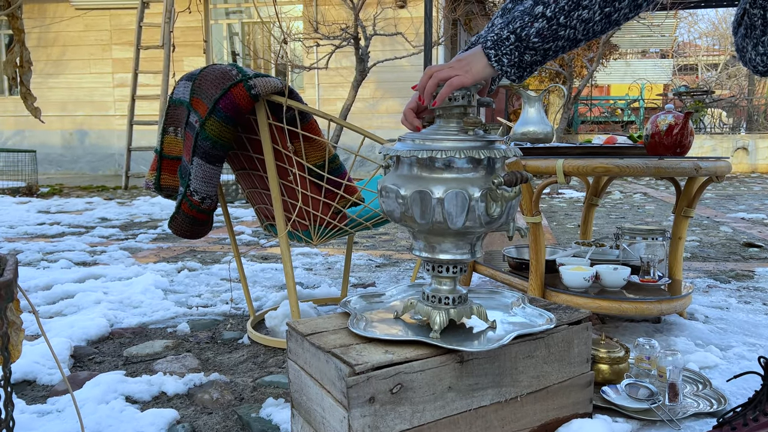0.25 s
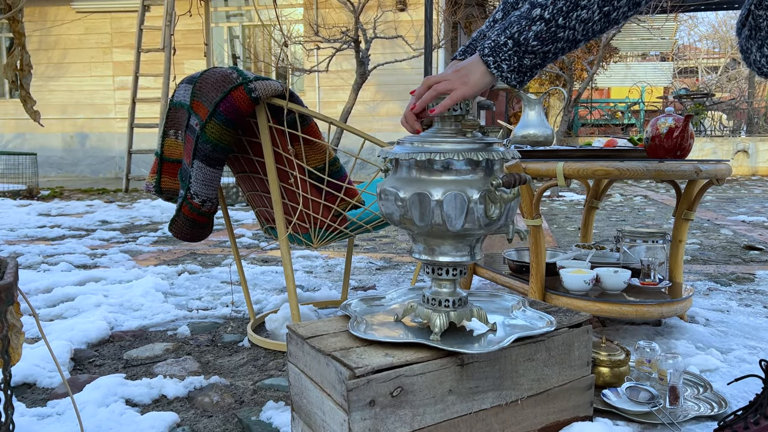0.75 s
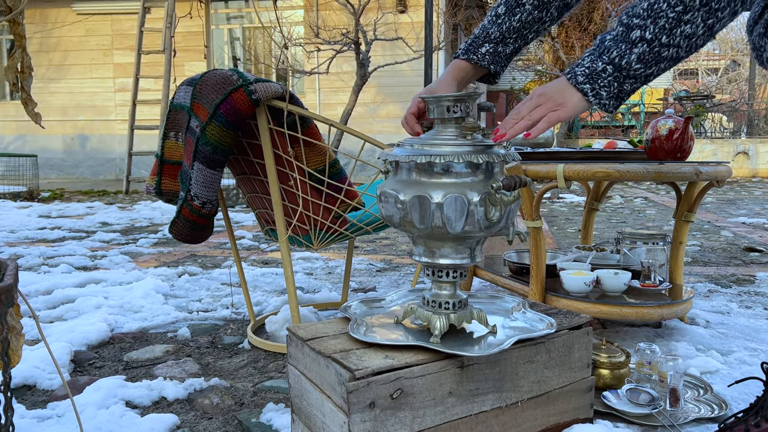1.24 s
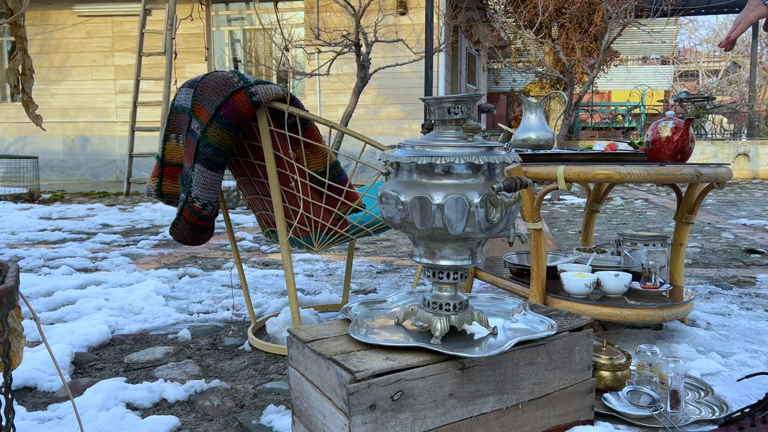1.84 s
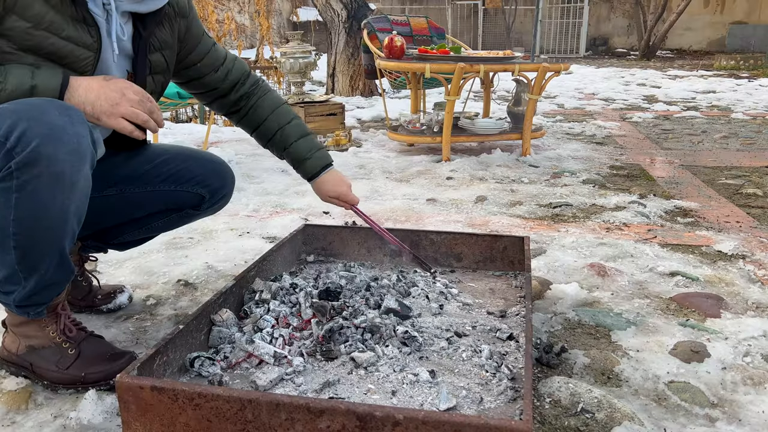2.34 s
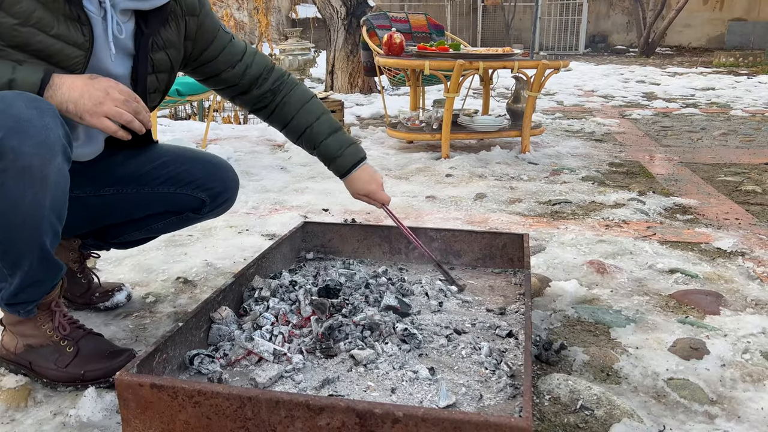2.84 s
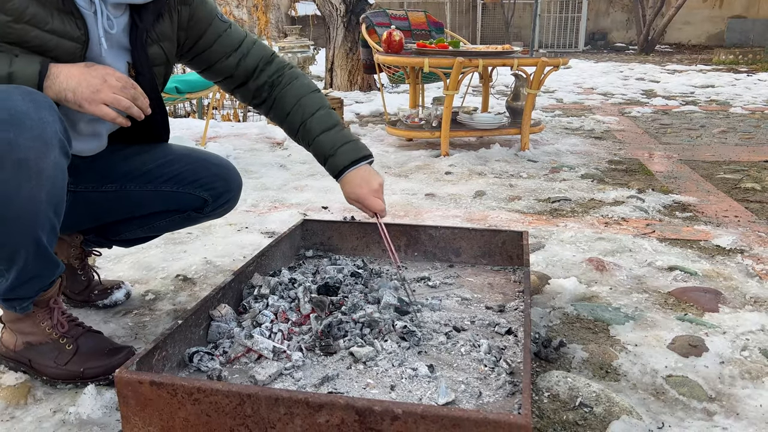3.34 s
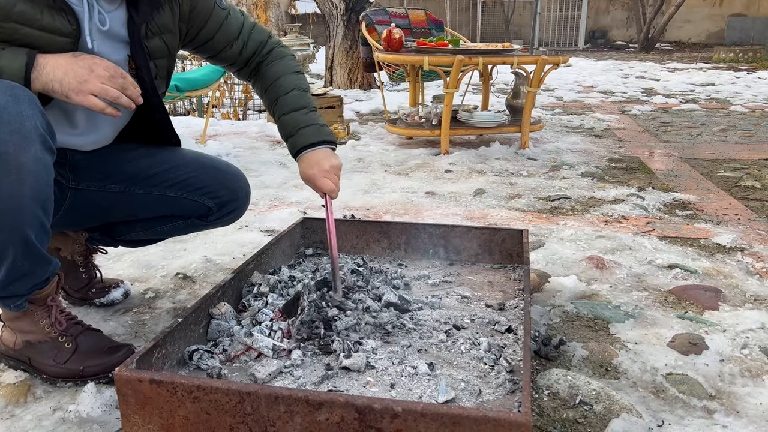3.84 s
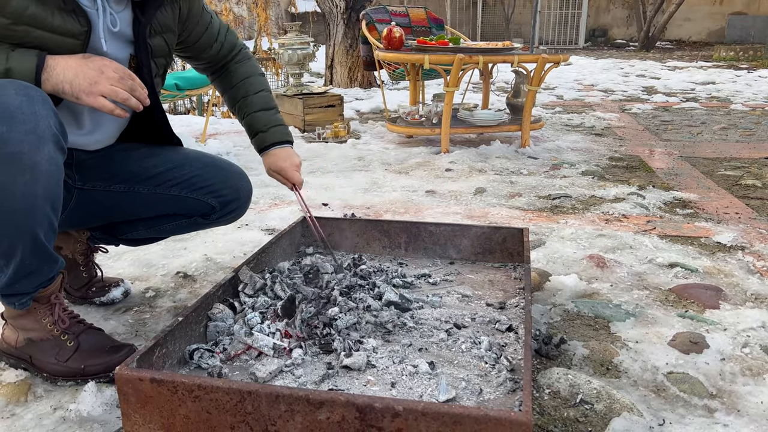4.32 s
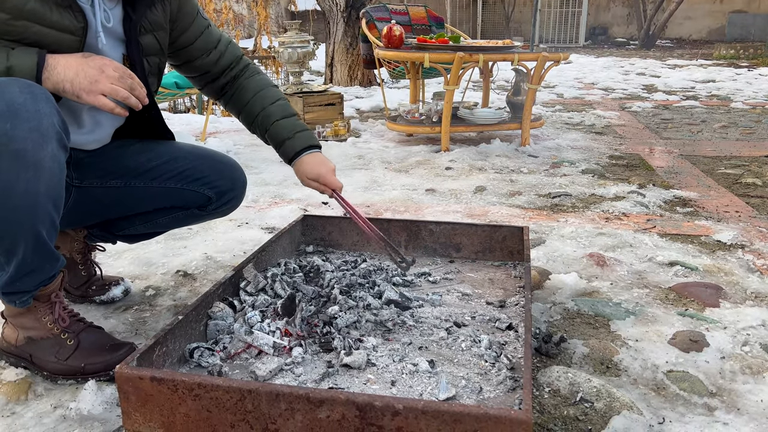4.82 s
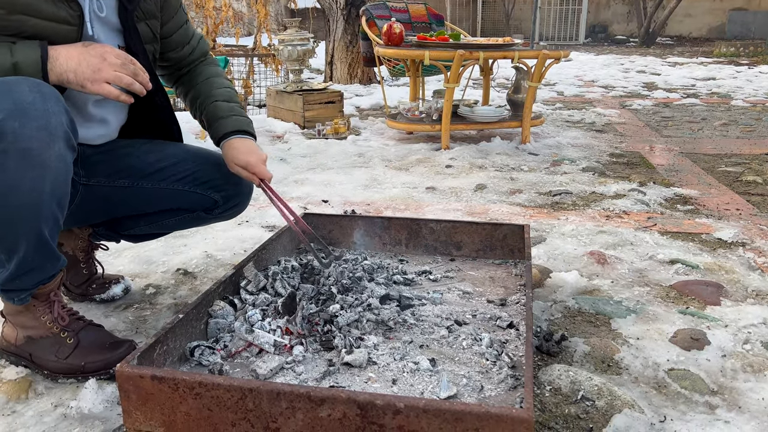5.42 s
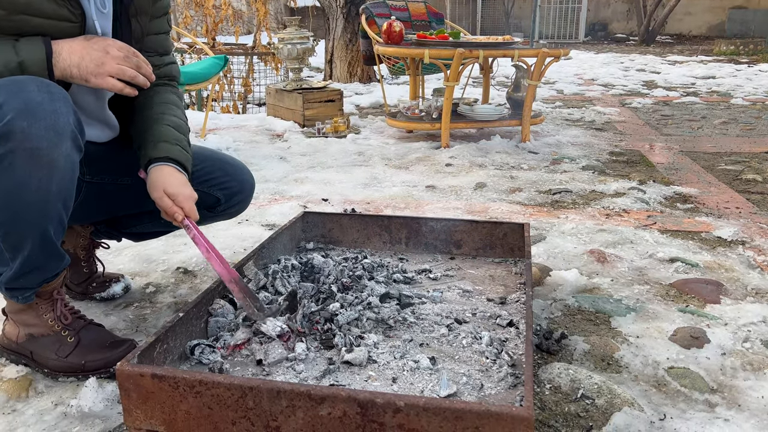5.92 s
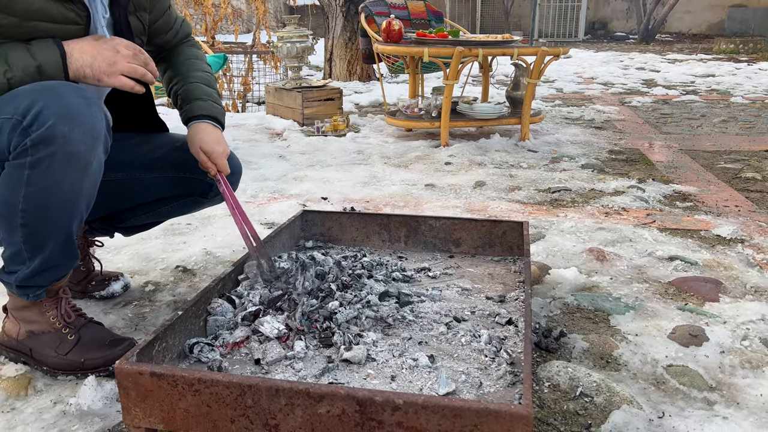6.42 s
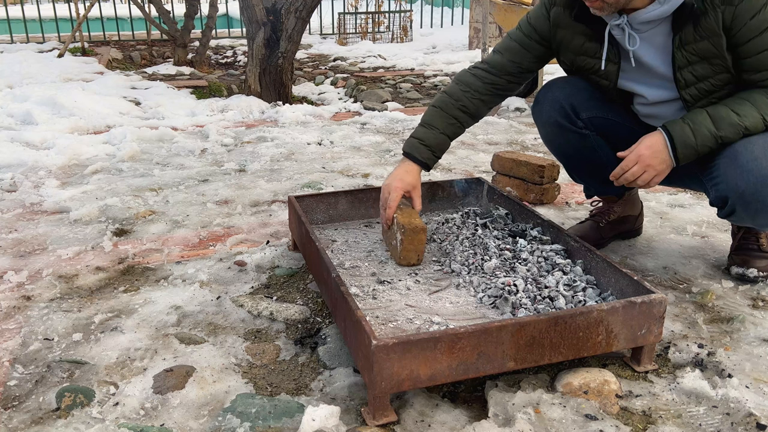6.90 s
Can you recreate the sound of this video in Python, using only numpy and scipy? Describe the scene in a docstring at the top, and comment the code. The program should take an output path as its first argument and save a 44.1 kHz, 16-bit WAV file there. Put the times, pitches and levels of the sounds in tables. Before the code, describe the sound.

Outdoors in a quiet yard, hands turn the loose metal top of a tea urn: gritty rubbing, a tiny high squeak, small taps and a faint ring. At about two seconds it cuts to steel tongs knocking a fire tray and crunching through charcoal, their arms clacking brightly. Finally a brick scrapes and knocks in the tray under a deep drone. Close stereo microphone, soft distant traffic.

```python
"""Steel tongs jab and rake charcoal in a sheet-steel fire tray, close by in a snowy yard with far traffic.
Noise bursts and gritty slips drive the sheet's resonances, ash and coals crunch, and the arms of the tongs clack.
Before that a hand turns the loose metal crown of a tea urn: rubbing grit, a gliding squeak, taps and ringing modes.
Last a brick is slid in the tray, under a nearer, deeper rumble. The traffic is shaped noise.
A two-port microphone hears each near source with its own time and level difference, plus the yard's echo."""
import sys
import numpy as np
from scipy import signal
from scipy.fft import rfft, irfft, next_fast_len
from scipy.io import wavfile
from scipy.ndimage import uniform_filter1d, map_coordinates

SR = 44100
rng = np.random.default_rng(int(sys.argv[2]) if len(sys.argv) > 2 else 0)


def dump(signal):
    """Clip the signal to [-1, 1] and save it as 16-bit WAV at the path in sys.argv[1]."""
    limited = np.clip(np.atleast_2d(signal).T, -1, 1)
    pcm = np.round(limited * 32767).astype(np.int16)
    wavfile.write(sys.argv[1], SR, pcm)


N = 315756  # length in samples

# sheet-steel tray resonances: (centre [Hz], width [Hz], level [dB])
TRAY_MODES = [(150, 92, -8), (308, 60, -1), (556, 53, -1.5), (664, 38, 2), (843, 120, -4), (980, 47, 2.5),
              (1140, 210, -7.5), (1609, 107, 0.5), (1770, 194, -5)]
# colour of crunching coals and ash: (frequency [Hz], relative level [dB])
CRUNCH_TONE = [(1000, -37), (2000, -0.5), (4700, 1.5), (6500, 3.5), (9000, -4), (12000, -4), (17000, -5)]
# jabs and tumbling coals that knock the tray: (time [s], level [dB], thud start pitch [Hz], thud level [dB])
JABS = [(2.172, -24, 443, -22), (2.182, -21, 342, -23.5), (2.242, -14, 1797, -27.5), (2.258, -30, 588, -27),
        (2.366, -30, 605, -26), (2.789, -22.5, 986, -25), (2.794, -18, 550, -27), (2.81, -20, 995, -31),
        (2.877, -26, 550, -32), (2.913, -21, 628, -29), (3.217, -51, 1650, -49), (3.382, -26, 694, -35.5),
        (4.052, -48, 404, -42), (4.275, -25, 503, -43.5), (4.392, -36.5, 678, -47),
        (4.914, -36, 572, -32.5), (5.756, -28, 655, -33), (6.109, -28, 730, -36.5), (6.125, -27, 640, -34),
        (6.249, -49, 673, -46), (6.349, -31, 386, -38), (6.56, -38.5, 393, -39), (6.747, -25.5, 790, -38.5),
        (6.821, -33, 627, -39), (6.925, -19, 650, -37), (6.967, -24, 662, -30.5), (7.046, -14.5, 818, -27)]
# the tongs stab the coals, which then settle: (time [s], fade t60 [s], tray level [dB], crunch level [dB])
STABS = [(2.175, 0.23, -29, -62), (2.243, 0.12, -29, -60), (2.79, 0.088, -27.5, -35),
         (3.217, 0.1, -43, -56), (3.372, 0.068, -40, -38.5), (3.883, 0.58, -43.5, -47),
         (4.263, 0.44, -40, -46.5), (4.564, 0.34, -43.5, -48), (4.914, 0.28, -43.5, -48),
         (5.296, 0.16, -41.5, -48.5), (5.743, 0.8, -48.5, -57.5), (6.094, 0.37, -45.5, -46),
         (6.314, 0.79, -67, -57.5), (6.535, 0.19, -39, -61), (6.744, 0.086, -36.5, -40.5),
         (6.821, 0.19, -51, -76), (6.924, 0.57, -41.5, -42)]
STAB_RISE_S = 0.005  # time to grow by 60 dB
SETTLE_DB, SETTLE_S = -24.5, 1.9  # slow trickle after each stab: level relative to the stab, t60
# tongs or brick dragged over ash and sheet: (start [s], length [s], tray level [dB], crunch level [dB])
DRAGS = [(2.299, 0.15, -37, -43.5), (2.361, 0.013, -34.5, -36), (2.583, 0.013, -67, -65.5),
         (2.845, 0.12, -37.5, -41.5), (2.969, 0.045, -39, -49), (3.422, .14, -51.5, -55),
         (4.966, 0.069, -68, -57.5), (5.408, 0.0098, -65, -64), (5.545, 0.15, -68, -66),
         (5.823, 0.037, -70, -61.5), (6.248, 0.012, -53, -86), (6.357, 0.013, -44.5, -56.5),
         (6.898, 0.052, -45, -49.5), (6.961, 0.085, -35, -47.5), (7.062, 0.08, -38.5, -52)]
DRAG_RISE_S, DRAG_FADE_S = 0.15, 0.19  # times to grow and to die by 60 dB
# phase between the ports for tray and tongs: (frequency [Hz], left lead [rad])
TRAY_LEAD = [(0, 0), (1700, 1.05), (3000, 1.1), (5500, 3.5), (9000, 3), (12300, 6.5), (16000, -10)]
# level between the ports for tray and tongs: (frequency [Hz], left minus right [dB])
TRAY_SIDE = [(100, -4), (550, 1), (1650, 1), (5000, 8.5), (9000, 1), (15000, 0)]
SPREAD_DB = 1.5  # coals away from the tip, heard differently by each port
SHEET_WIDE_DB = -8  # far parts of the sheet, heard differently by each port

# the arms of the tongs clack together: (time [s], level [dB])
CLACKS = [(2.185, -15), (2.282, -34), (2.328, -33), (2.428, -23.5), (2.66, -50), (3.369, -35), (3.383, -14),
          (3.402, -18), (3.424, -25.5), (3.4406, -29), (3.498, -36), (3.877, -33), (3.8993, -15),
          (3.923, -28.5), (4.2776, -14.5), (4.319, -23), (4.579, -12.5), (4.6, -33), (4.632, -36.5),
          (4.93, -27.5), (5.3525, -38), (6.125, -27), (7.044, -25)]
# steel modes of the arms: (centre [Hz], width [Hz], level [dB])
TONGS_MODES = [(3200, 400, -3), (4410, 500, 2), (5900, 330, 9), (6700, 300, 11), (9000, 1400, 3),
               (11650, 900, 4), (15000, 2900, -1)]

# place of crown, then tongs tip, then brick: (time [s], left port earlier by [microseconds])
PLACE = [(.2, 13), (.3, -250), (2.05, -220), (2.1, -16), (3.3, -37), (3.8, 22), (5.2, 40), (5.6, 74),
         (6.6, 86.5), (6.72, -31), (7.16, -61)]

# colour of the rubbing body: (frequency [Hz], relative level [dB])
RUB_BODY = [(180, 2), (350, 4.5), (1500, -6), (4500, -29)]
# colour of the rubbing treble: (frequency [Hz], relative level [dB])
RUB_TOP = [(1500, -3), (2600, 0.5), (7000, -2.5), (12000, -11), (17000, -10)]
# hands and crown rubbing on the urn: (start [s], length [s], rub level [dB], treble level [dB])
RUBS = [(0, 0.13, -45, -57), (0.099, 0.018, -39, -56), (0.153, 0.036, -59, -71), (0.325, 0.035, -48.5, -58),
        (0.688, 0.041, -75, -79.5), (0.831, 0.0043, -48.5, -64.5), (1.295, 0.073, -70, -68),
        (1.396, 0.0046, -53, -88), (1.671, 0.047, -56, -58.5), (1.764, 0.066, -64, -64),
        (1.867, 0.064, -48, -54), (1.977, 0.0055, -72, -57)]
# one longer, faint rub of the hands: (start [s], length [s], rub level [dB], treble level [dB])
HANDS = (1, 0.5, -60, -143.5)
RUB_RISE_S, RUB_FADE_S = 0.078, 0.11  # times to grow and to die by 60 dB
SLEEVE_DB = 6  # rubbing treble that each port hears differently
# the urn's body: (centre [Hz], width [Hz], level [dB])
SHELL_MODES = [(311, 130, -4.5), (853, 110, 6.5), (2190, 570, 9)]
# pitch and level of the turning crown's squeak: (time [s], pitch [Hz], level [dB])
SQUEAK = [(0, 7200, -56), (.027, 7080, -42), (.043, 7050, -50), (.048, 7020, -25), (.066, 6950, -52),
          (.15, 6900, -68), (.3, 6900, -95)]
# partials of the squeak: (share of the pitch [ratio], level [dB])
SQUEAK_MODES = [(.587, -14), (.958, -2), (1, 0), (1.18, -11)]
# crown touches urn: (time [s], tap level [dB], tap edge [Hz], knock start pitch [Hz], knock level [dB])
CLINKS = [(.002, -45, 2400, 743, -44.5), (.028, -40, 3000, 803, -37), (0.067, -33.5, 5140, 334, -27.5),
          (.096, -24, 6300, 504, -33), (0.461, -35, 2880, 1230, -50), (.828, -28.5, 2900, 916, -61),
          (1.304, -49, 5630, 938, -42.5), (1.394, -31, 3040, 925, -57), (1.677, -33, 2980, 300, -37),
          (1.822, -41, 4520, 412, -38), (1.886, -47, 4500, 394, -29), (1.908, -29, 4160, 260, -32),
          (1.975, -54, 4600, 487, -39)]
# blows that leave the crown ringing: (time [s], level [dB])
RINGS = [(.064, -42), (.0961, -43)]
# ringing modes of the crown: (frequency [Hz], level [dB], t60 [s])
CROWN_MODES = [(868, 5, .58), (903, 3, .25), (942, -5, .35), (1087, -4, .08), (1490, -1, .07),
               (1830, -12, .4), (2050, -5, .12), (2780, -6, .08)]
# phase between the ports for the urn: (frequency [Hz], left lead [rad])
URN_LEAD = [(0, 0.056), (16000, 1)]

# decay of the yard's walls: (frequency [Hz], t60 [s])
YARD = [(200, 0.21), (10000, 0.058)]
# swell of the far traffic: (time [s], rumble level [dB], murmur level [dB])
TRAFFIC = [(0, -47, -46), (.8, -49.5, -49.5), (1.6, -46.5, -47.5), (1.95, -45, -45), (2.6, -45.5, -49.5),
           (3.3, -51, -50), (5.5, -48, -50), (7.16, -54.5, -47.5)]
# colour of the rumble: (frequency [Hz], relative level [dB])
RUMBLE = [(15, -60), (25, -25), (48, -0.5), (81, 8), (160, -57), (350, -120)]
# colour of the murmur: (frequency [Hz], relative level [dB])
MURMUR = [(65, -16.5), (110, -2.5), (390, -21.5), (580, -27), (1180, -27), (1870, -33), (2940, -45.5),
          (5890, -46), (12500, -62.5), (14000, -100)]
# deep drone close by at the end: (time [s], level [dB])
DRONE = [(6.69, -84), (6.73, -48.5), (6.78, -35), (7.16, -35)]
# colour of the drone: (frequency [Hz], relative level [dB])
DRONE_TONE = [(25, -33), (42, 6), (58, 0), (100, -16), (150, -10), (250, -74)]
# yard noise at the two ports: (frequency [Hz], left-right likeness [-1 to 1])
ALIKE = [(30, 1), (150, 0.88), (600, 0.019), (4000, 0.033)]
# overall colour of the sound: (frequency [Hz], gain [dB])
OVERALL_COLOUR = [(22, -26), (40, 1), (8800, -1), (10200, -11.5), (11200, 2), (12900, -2.5), (13700, -19),
                  (14700, -3.5), (16000, -6), (16400, -45)]
TOP_HZ = 17140  # band limit


def tray():
    """Slips of the tongs and knocks drive the sheet's resonances; coals and ash crunch on top."""
    stabs = [(s, 0, STAB_RISE_S, fade, *db) for s, fade, *db in STABS]
    trickle = [(s, 0, STAB_RISE_S, SETTLE_S, *np.add(db, SETTLE_DB)) for s, fade, *db in STABS]
    drags = [(s, length, DRAG_RISE_S, DRAG_FADE_S, *db) for s, length, *db in DRAGS]
    tray_db, crunch_db = gestures(stabs + trickle + drags)
    snag_db = 1.8 * wobble(45)  # the tip catches and lets go

    def sheet(hz):
        broad = amp(-13.0) * hz / (hz - 300j) / (1 + 1j * hz / 2600)
        return modes(TRAY_MODES)(hz) + broad

    slips = [grit(1200, 3.5, 0.7, patchy_db=2.5) for part in range(3)]
    slips = unit(filtered(slips, sheet))
    low = filtered(slips, lambda hz: 1 / (1 + (hz / 1300) ** 4))
    # only hard strokes reach the bare sheet and wake its upper modes
    hard = amp(np.minimum(0.44 * (tray_db + 39.5), 0))
    rake, *far = amp(tray_db + snag_db + wobble(90)) * (low + hard * (slips - low))

    def coal_response(hz):
        arms = 1 + amp(-18) * modes(TONGS_MODES)(hz)  # the crunch runs up the steel arms
        return amp(along(CRUNCH_TONE, hz)) * arms

    coals = [grit(1500, 6.3, 0.66, patchy_db=4) for part in range(3)]
    coals = unit(filtered(coals, coal_response))
    crunch, *wide = [amp(crunch_db + 0.74 * snag_db + 1.24 * wobble(79)) * part for part in coals]

    force, thuds = np.zeros(N + SR), np.zeros(N + SR)
    for s, db, thud_hz, thud_db in JABS:
        # the tip bites through crumbling coal: a sharp start, then a dying rattle
        add(force, s, puff(db + 3, 0.07, 0.0002) + puff(db + 12, 0.004, 0.00005))
        add(thuds, s, thud(thud_db, thud_hz, 0.078, rough_db=3.5))

    tip = rake + crunch + filtered(force[:N], sheet) + thuds[:N]
    around = amp(SHEET_WIDE_DB) * np.array(far) + amp(SPREAD_DB) * np.array(wide)
    around = filtered(around, lambda hz: amp(along(TRAY_SIDE, hz) * [[0.5], [-0.5]]))
    return moving(placed(tip, TRAY_LEAD, TRAY_SIDE)) + around


def tongs():
    """Short bright clacks: the rough steel arms meet and their damped modes answer."""
    force = np.zeros(N + SR)
    for s, db in CLACKS:
        add(force, s, puff(db + 6, 0.009, 0.001))
    clacks = filtered(force[:N], modes(TONGS_MODES))
    return moving(placed(clacks, TRAY_LEAD, TRAY_SIDE))


def urn():
    """Gritty friction through the shell, a squeak, and dry taps and rings of the loose crown."""
    rows = [(s, length, RUB_RISE_S, RUB_FADE_S, *db) for s, length, *db in RUBS + [HANDS]]
    rub_db, top_db = gestures(rows)
    rub = coloured(grit(1182, 3.8, 1.0, patchy_db=4.5), RUB_BODY)
    rub = amp(rub_db) * unit(filtered(rub, lambda hz: 0.44 + modes(SHELL_MODES)(hz)))
    # one treble in common, then one for each port
    top, *wide = [amp(top_db) * coloured(grit(4300, 5.2, 0.36, patchy_db=5.0), RUB_TOP) for part in range(3)]
    taps = np.zeros(N + SR)
    for s, db, edge_hz, knock_hz, knock_db in CLINKS:
        # softer contacts are duller; low knocks die fast in the hand, higher ones ring in the shell
        contact = signal.butter(2, [600, np.clip(edge_hz, 900, 16000)], "band", fs=SR)
        tap = signal.lfilter(*contact, puff(db, 0.056, 0.0017))
        knock_t60 = 0.14 if knock_hz > 600 else 0.045
        add(taps, s, tap + thud(knock_db, knock_hz, knock_t60, rough_db=2.5))
    for s, db in RINGS:
        # the loose crown keeps touching its seat, which roughens the ring
        add(taps, s, amp(db + 2.5 * wobble(50)[:SR // 2]) * ring(CROWN_MODES))
    side = [(1000, 1.8)]  # left louder by 1.8 dB at every frequency
    crown = placed(taps[:N] + rub + top + squeak(), URN_LEAD, side)
    return moving(crown) + amp(SLEEVE_DB) * np.array(wide)


def squeak():
    """Stick-slip of the turning crown: gliding partials, each unsteady in pitch and level."""
    pitch_hz, db = curves(SQUEAK)
    out = 0
    for share, level in SQUEAK_MODES:
        phase = 2 * np.pi * np.cumsum(share * pitch_hz + 70 * wobble(400)) / SR
        out = out + amp(db + level + 3 * wobble(200)) * np.sin(phase)
    return out


def walls(x):
    """Each frequency of the yard's answer dies at its own speed."""
    hz, t, z = signal.stft(rng.standard_normal((2, SR // 2)), SR, nperseg=256)
    tail = signal.istft(z * amp(-60 * t / along(YARD, hz)[:, None]), SR, nperseg=256)[1]
    return signal.fftconvolve(x, tail / np.linalg.norm(tail[0]), axes=1)[:, :N]


def traffic():
    """Far noise, near mono in the bass, slowly swelling; the drone joins it."""
    rumble_db, murmur_db = curves(TRAFFIC)
    layers = [(rumble_db + 0.67 * wobble(5.7), RUMBLE),
              (murmur_db + 1.0 * wobble(4.8) + 1.1 * wobble(1.505), MURMUR),
              (curves(DRONE)[0], DRONE_TONE)]
    out = 0
    for db, spectrum in layers:
        def mid_side(hz):
            turn = np.arccos(np.clip(along(ALIKE, hz), -1, 1)) / 2  # sets the likeness of the ports
            return amp(along(spectrum, hz)) * [np.cos(turn), np.sin(turn)]
        mid, side = filtered(rng.standard_normal((2, N)), mid_side)
        out = out + amp(db) * unit(np.array([mid + side, mid - side]))
    return out * amp([[0.8], [-0.8]])  # left slightly louder


def gestures(rows):
    """Levels in dB of overlapping (start s, length s, rise s, fade s, dB, dB): rise, hold, fade."""
    t, power = np.arange(N) / SR, 1e-12
    for s, length, rise, fade, *db in rows:
        # the rise ends at the start time, where the hold begins
        shape_db = -60 * np.maximum(np.maximum((s - t) / rise, (t - s - length) / fade), 0)
        power = power + amp(2 * np.array(db))[:, None] * amp(2 * shape_db)
    return 10 * np.log10(power)


def grit(per_second, spread_db, smooth, patchy_db):
    """Dense slips of random size over smooth noise; pieces of changing size colour it in patches."""
    sizes = amp(spread_db * rng.standard_normal(N)) * np.sign(rng.standard_normal(N))
    slips = (rng.random(N) < per_second / SR) * sizes
    z = signal.stft(unit(slips) + smooth * rng.standard_normal(N), nperseg=256)[2]
    field = uniform_filter1d(rng.standard_normal(z.shape), size=5, axis=0)
    field = uniform_filter1d(field, size=8, axis=1)
    return signal.istft(z * amp(patchy_db * unit(field)), nperseg=256)[1][:N]


def thud(db, hz, t60, rough_db):
    """A soft push whose pitch sags as the contact relaxes; crumbs under it make it flutter."""
    t = np.arange(SR // 4) / SR
    flutter = map_coordinates(rng.standard_normal(60), [t * 200])
    phase = 2 * np.pi * hz * t / (1 + 2.46 * t) + 0.84 * (flutter - flutter[0])
    return amp(db - 60 * t / t60 + rough_db * flutter) * np.sin(phase)


def puff(db, t60, attack):
    """A dying burst of noise; t60 and attack in seconds."""
    t = np.arange(SR // 4) / SR
    return amp(db - 60 * t / t60) * (1 - np.exp(-t / attack)) * rng.standard_normal(len(t))


def ring(table):
    """One blow on a table of modes, each a decaying sine."""
    t = np.arange(SR // 2) / SR
    return sum(amp(db - 60 * t / t60) * np.sin(2 * np.pi * hz * t) for hz, db, t60 in table)


def modes(table):
    """Causal response of (Hz, width Hz, dB) resonances with alternating signs."""
    def response(hz):
        total = 0
        for k, (centre, width, db) in enumerate(table):
            damping = 1j * hz * width
            total = total + (-1) ** k * amp(db) * damping / (centre * centre - hz * hz + damping)
        return total
    return response


def placed(x, lead, side):
    """A source at the two ports: phase lead, level difference, and close ground echoes for each."""
    def ports(hz):
        half = np.exp(0.5j * np.interp(hz, *np.transpose(lead))) * amp(along(side, hz) / 2)
        delays_s = rng.uniform(0.00051, 0.0025, (4, 2, 1))
        echoes = np.exp(-2j * np.pi * hz * delays_s).sum(axis=0)
        return np.array([half, 1 / half]) * (1 + amp(-14) * echoes * hz / (hz + 2500))
    return filtered(x, ports)


def moving(pair):
    """The left port hears a source earlier as it moves left."""
    early = curves(PLACE)[0] * SR / 10 ** 6  # samples
    return np.array([map_coordinates(pair[0], [np.arange(N) + early], order=5), pair[1]])


def amp(db):
    """Gain of a level in dB."""
    return 10 ** (np.asarray(db) / 20)


def unit(x):
    """x at rms 1."""
    return x / np.sqrt(np.mean(x ** 2) + 1e-20)


def along(points, hz):
    """(Hz, value) points read on a log frequency axis."""
    f, v = np.transpose(points)
    return np.interp(np.log(hz + 1), np.log(f + 1), v)


def curves(rows):
    """One value per sample for each column after the time."""
    s, *cols = np.transpose(rows)
    return [np.interp(np.arange(N) / SR, s, c) for c in cols]


def wobble(rate):
    """A smooth random curve, rate knots a second."""
    return map_coordinates(rng.standard_normal(int(N * rate / SR) + 4), [np.arange(N) * rate / SR])


def filtered(x, response):
    """x times a complex response of frequency."""
    m = next_fast_len(N + SR // 2)
    return irfft(rfft(x, m) * response(np.fft.rfftfreq(m, 1 / SR)), m)[..., :N]


def coloured(x, spectrum):
    """x given a spectrum, at rms 1."""
    return unit(filtered(x, lambda hz: amp(along(spectrum, hz))))


def add(out, s, sound):
    """Mixes a short sound in at s seconds."""
    out[round(s * SR):][:len(sound)] += sound


def scene():
    """Near sources, their echo in the yard, and the traffic."""
    near, clacks = tray() + urn(), tongs()
    echo = amp(-5.5) * walls(near + 0.5 * clacks)
    return near + clacks + echo + traffic()


def record(dry):
    """The deepest bass is thinned and the treble dips twice; nothing passes the band limit."""
    return filtered(dry, lambda hz: amp(along(OVERALL_COLOUR, hz)) * (hz < TOP_HZ))


dry = scene()
out = record(dry)
dump(out)
```